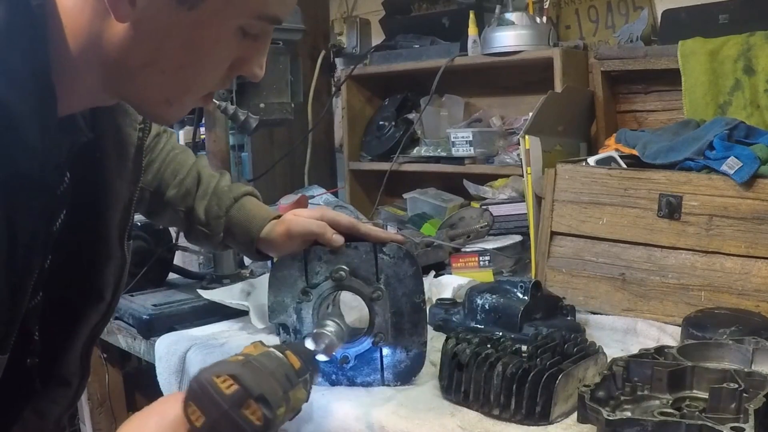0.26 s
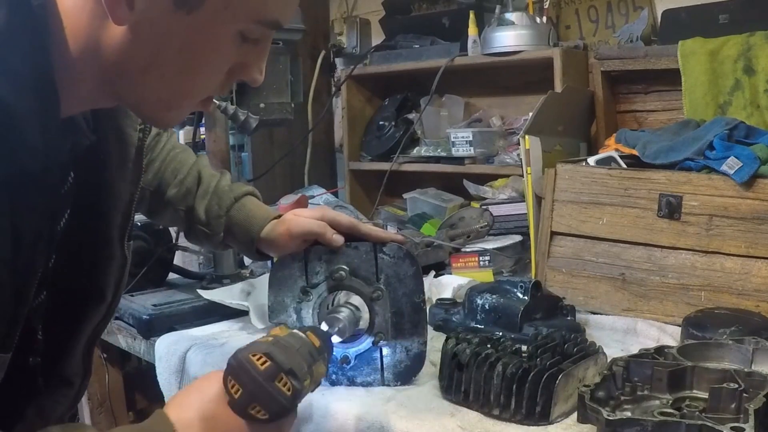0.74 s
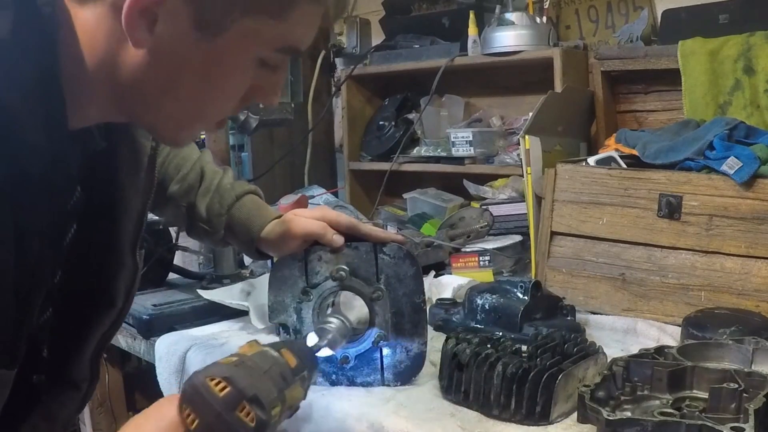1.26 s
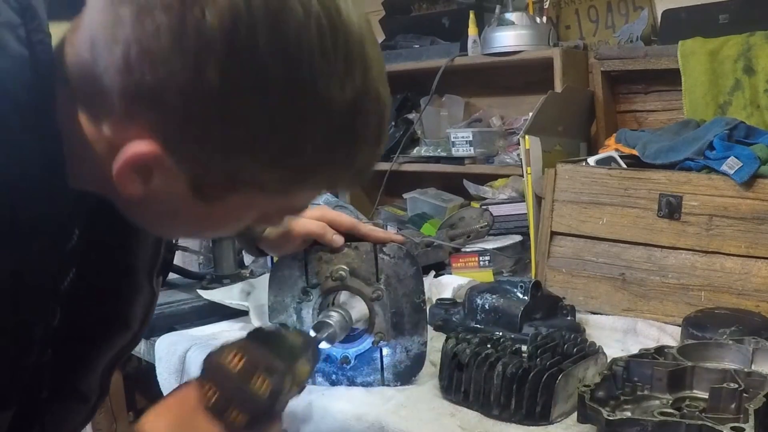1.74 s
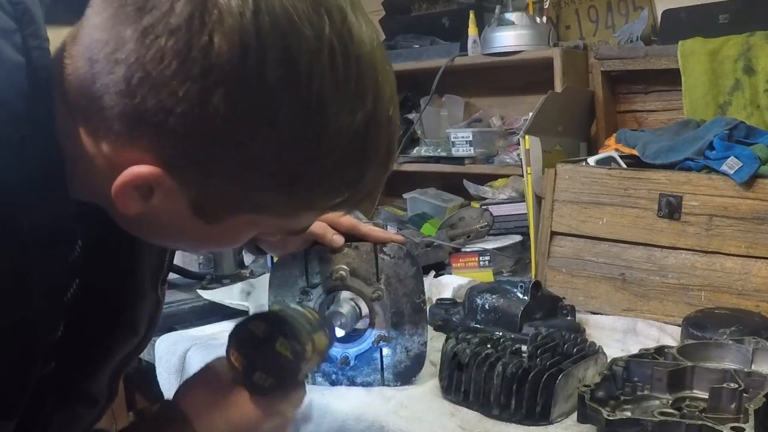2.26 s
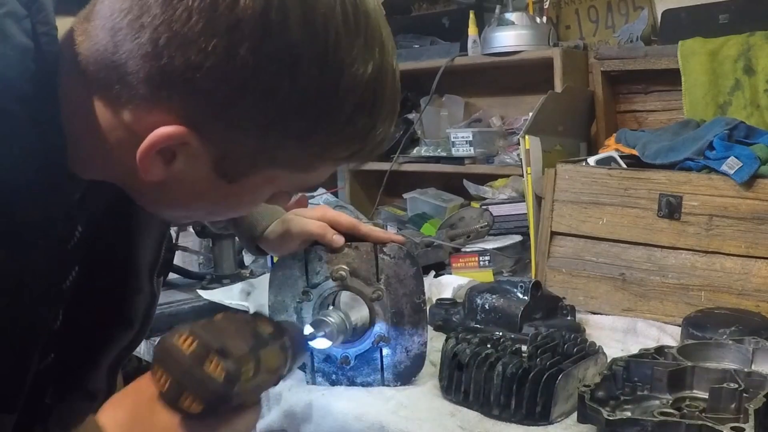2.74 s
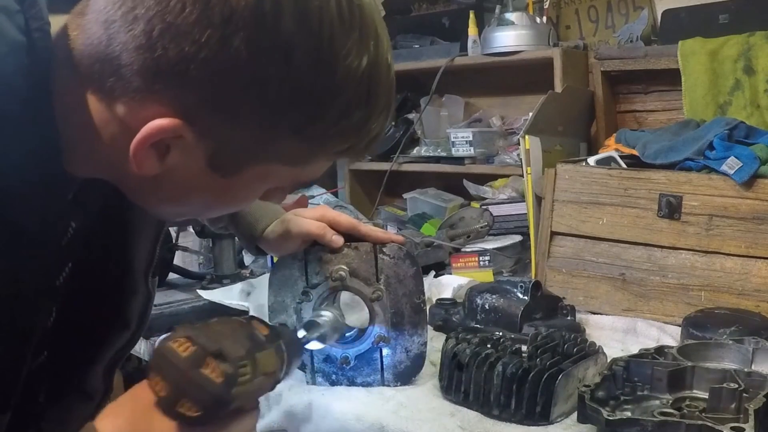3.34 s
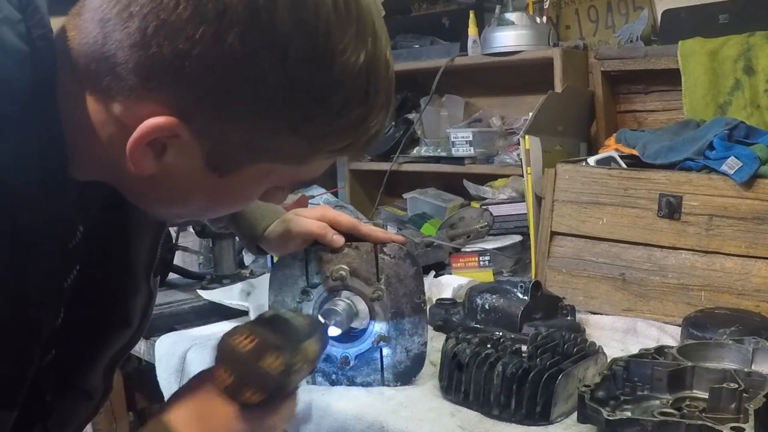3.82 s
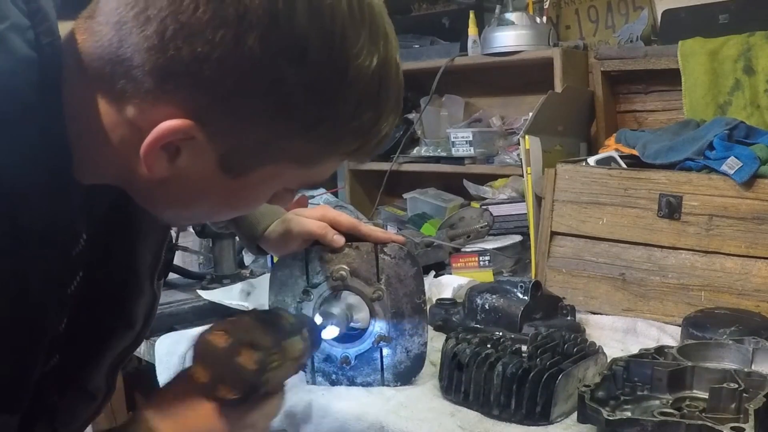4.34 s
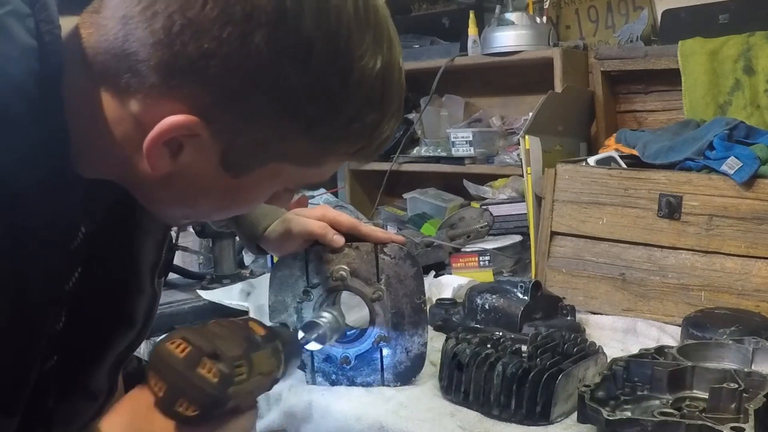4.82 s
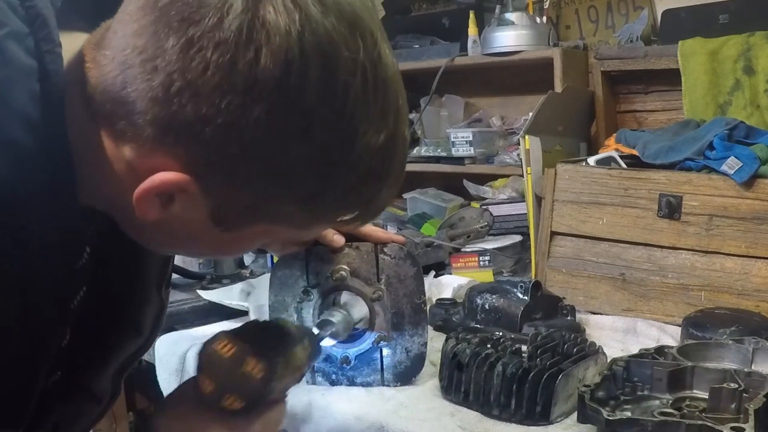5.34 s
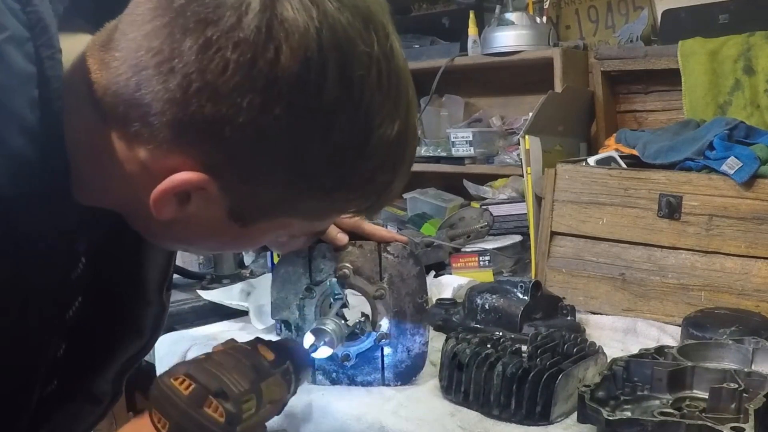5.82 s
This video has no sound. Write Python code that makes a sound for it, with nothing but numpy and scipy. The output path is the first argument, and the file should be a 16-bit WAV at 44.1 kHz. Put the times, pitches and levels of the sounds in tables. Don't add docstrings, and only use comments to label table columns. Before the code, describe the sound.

In a small, dry workshop, heard an arm's length away, a cordless drill is already running, honing a metal cylinder. Its gear whine near 2 kHz surges to almost 3 kHz around 0.3 s, then settles by 0.75 s, over a rough fan-and-brush roar and a thin steady 4 kHz whistle. Abrasive stones rasp and hiss brightly, throbbing with rotation. Stroke ends bring brief clattering bursts, bench shudder and sagging pitch: firm at 0.9, 1.6 and 2.4 s, light at 3.1, softer at 3.8, jolting at 4.5, heavy at 5.3. Pitch dips toward 2.7-3 s, jumps at 3.2, drops at 3.5, then climbs and holds fast from 3.8. Tiny spring pings appear occasionally. At 5.7 s the tool jumps the rim: hard knocks, a short casting ring, scraping falls away. The motor brakes and stops by 5.92 s, leaving faint ticks and low room noise.

```python
import sys
import numpy as np
from scipy import signal
from scipy.fft import rfft, irfft, next_fast_len
from scipy.io import wavfile
from scipy.ndimage import uniform_filter1d

SR = 44100
rng = np.random.default_rng(int(sys.argv[2]) if len(sys.argv) > 2 else 0)


def makeup_ratio(level_db):
    decades = np.asarray(level_db, float) / 20
    return 10 ** decades


def bounce(signal):
    frames = np.transpose(np.atleast_2d(signal))
    limited = np.clip(frames, -1, 1)
    pcm = np.round(limited * 32767).astype(np.int16)
    wavfile.write(sys.argv[1], SR, pcm)


N = 268156
T = np.arange(N) / SR
SLOW = T[::64]

CARRIER = 0.01115
FINGER_S = 0.05
RIM_S, STOP_S = 5.71, 5.915
BIND_LAG_S = 0.0395

# start_s, mesh_hz (teeth of the sun gear meeting per second, hone running free)
TRIGGER = [(0, 2234), (0.14, 2314), (0.24, 2877), (0.32, 2935), (0.41, 2854), (0.6, 2250), (0.74, 2041),
           (1.9, 2014), (2.02, 1884), (2.27, 1950), (2.63, 1831), (2.72, 1705), (3.0, 1675), (3.19, 2697),
           (3.3, 2477), (3.49, 1556), (3.6, 2052), (3.82, 2464), (5.05, 2506)]
# middle_s, half_length_s, bench_db, speed_sag_hz, grip (0 to 1)
STROKES = [
    (0.182, 0.065, -62, 0, 0.02),
    (0.888, 0.053, -33.5, 120, 0.75),
    (1.633, 0.051, -34.5, 160, 0.49),
    (2.382, 0.085, -34, 230, 0.97),
    (3.117, 0.031, -47, 9.5, 0.18),
    (3.766, 0.068, -50, 20, 0.5),
    (4.54, .045, -27.5, 91.5, 0.87),
    (5.277, 0.075, -30.5, 219.5, 0.87),
    (5.706, 0.038, -29.5, 8.5, 0),
]


def unit(x):
    return x / np.sqrt(np.mean(x ** 2))


def curves(*tables):
    s, *columns = np.transpose(np.vstack(tables))
    return [np.interp(T, s, column) for column in columns]


def bumps(at, half, size, rise=1, fall=1):
    total = np.zeros(len(SLOW))
    for s, width, height in zip(at, half, size):
        width = width * np.where(SLOW < s, rise, fall)
        total += height * np.exp(-0.5 * ((SLOW - s) / width) ** 2)
    return np.interp(T, SLOW, total)


def soft_step(at, fall):
    return 0.5 + 0.5 * np.tanh((SLOW - at) / fall)


def walk(rate):
    k = int(SR / rate)
    held = np.repeat(rng.standard_normal(N // k + 1), k)
    held = uniform_filter1d(uniform_filter1d(held, k), k)[:N]
    return unit(held - uniform_filter1d(held, 5 * k))


def tint(x, points=((1, 0), (2, 0)), peaks=(), lo_hz=0, hi_hz=1e6):
    size = next_fast_len(len(x))
    hz = np.arange(size // 2 + 1) * SR / size + 1
    point_hz, point_db = np.transpose(np.array(points))
    gain = makeup_ratio(np.interp(np.log(hz), np.log(point_hz), point_db))
    for centre, width, db in peaks:
        gain = gain * makeup_ratio(db / (1 + (2 * (hz - centre) / width) ** 2))
    gain = gain / np.sqrt((1 + (lo_hz / hz) ** 12) * (1 + (hz / hi_hz) ** 12))
    return irfft(rfft(x, size) * gain, size)[:len(x)]


def ring(x, hz, t60):
    r = np.exp(-np.log(1000) / (t60 * SR))
    w = 2 * np.pi * hz / SR
    return signal.lfilter([np.sin(w)], [1, -2 * r * np.cos(w), r * r], x)


def grit(rate, spread_db, tail_s):
    hit = rng.random(N) < rate / SR
    size = np.minimum(rng.exponential(size=N), 3)
    slips = signal.lfilter([1], [1, -np.exp(-1 / (tail_s * SR))], hit * makeup_ratio(spread_db * size))
    return unit(rng.standard_normal(N) * (1 + 0.27 * slips))


def tone(cycles, db, wobble_db):
    return np.sqrt(2) * makeup_ratio(db + wobble_db * walk(24.97)) * np.sin(2 * np.pi * cycles)


def speed():
    # start_s, mesh_hz
    run_down = [
        (5.6, 2292),
        (5.72, 2033),
        (5.8, 1902),
        (5.87, 1680),
        (5.92, 1390),
    ]
    at, half, _, sag, _ = np.transpose(STROKES)
    free, = curves(TRIGGER, run_down)
    return uniform_filter1d(free, int(FINGER_S * SR)) - bumps(at + BIND_LAG_S, half, sag)


def faster():
    return (curves(TRIGGER)[0] - 2250) / 1000


def effort(db, swing_db, loudest, bound_db, off_db, coast_db, brake_db=0, off_s=RIM_S):
    # start_s, level_db
    noise_level = [(0, 1), (0.3, 0), (0.62, -0.3), (0.85, 0), (1.3, 0.5), (1.5, 0.5), (1.95, -0.4), (2.2, 1.4),
                   (2.7, 0), (3.1, 1), (3.4, -0.5), (3.62, 1.7), (3.95, 0), (4.35, 1), (4.68, -1.5), (5.1, 1),
                   (5.42, 0), (5.9, 0)]
    stroke_s, duck_db, recover_s = 0.32, -2, 0.31
    at, half, _, _, grip = np.transpose(STROKES)
    ends = np.r_[at[0] - stroke_s, at[:-1], at[-2] + stroke_s]
    stroke = np.interp(SLOW, ends, np.arange(len(ends)))
    duck = np.zeros(len(SLOW))
    for s, width, strength in zip(at + half, half, grip):
        duck += strength * soft_step(s, width / 2) * np.exp(-np.maximum(SLOW - s, 0) / recover_s)
    db = db + swing_db * np.cos(2 * np.pi * (stroke - loudest))
    db = db + duck_db * duck + off_db * soft_step(off_s, 0.019)
    db = np.interp(T, SLOW, db) + curves(noise_level)[0]
    db += bound_db * bumps(at + BIND_LAG_S, half, grip)
    db += bumps([5.865], [0.036], [brake_db])
    stopped = np.interp(T, SLOW, soft_step(STOP_S, 0.018))
    return (1 - stopped) * db + stopped * coast_db


def gear_whine(hz, turns, carrier):
    # start_s, sun_gear_db, ring_gear_db; then the same while running down
    teeth = [(0.1, -37, -34), (0.2, -33, -32), (0.3, -34, -29.5), (0.42, -31, -33), (0.5, -31, -41),
             (0.78, -31, -39), (1.1, -34, -36.5), (1.36, -29, -36), (1.62, -35.5, -39.5), (1.9, -30, -35),
             (2.25, -36, -40), (2.5, -35, -40.5), (2.63, -29.5, -41), (2.72, -35, -38), (3.0, -42, -40),
             (3.06, -35, -36), (3.2, -39, -37), (3.4, -33, -35), (3.5, -33, -35), (3.62, -35, -35.5),
             (3.76, -52, -39), (4.1, -32.5, -46), (4.55, -55, -46), (4.76, -35.5, -39), (5.02, -31.5, -36),
             (5.3, -64, -39)]
    teeth_down = [(5.7, -42, -40), (5.74, -33, -48), (5.86, -32, -37), (5.92, -34, -50)]
    # multiple, level_db
    mesh_orders = [(1, 0), (2, -9)]
    ring_orders = [(2, -4), (4, -5)]
    # centre_hz, width_hz, level_db
    nose = [(2700, 300, 4), (3180, 400, -12)]
    gearcase = [(850, 52, 8), (1022, 14, -16)]
    # middle_s, half_length_s, gain_db
    third_sings = [(0.3, .05, 2), (2.0, .1, 3), (2.85, .12, 9), (3.1, .05, 9), (3.3, 0.069, 5.5),
                   (3.55, 0.048, 11), (3.68, .05, 8.9)]
    ring_share, planet_share = 0.512, 0.26

    mesh_db, ring_db = curves(teeth, teeth_down)
    slowing = np.clip(-np.gradient(curves(TRIGGER)[0]) * SR / 1000, 0, None)
    mesh_db = mesh_db - 2.6 * uniform_filter1d(slowing, int(FINGER_S * SR))
    planet_db = -49 + 1.15 * (hz - 2000) / 100 + 3.1 * walk(6)

    fast = np.clip((hz - 2100) / 400, 0, 1)
    chatter = 0.006 + 0.009 * fast + 0.008 * (T > RIM_S)
    sun = turns + np.cumsum(chatter * hz * walk(220)) / SR
    ring_chatter = (0.0042 + 0.01 * fast) * ring_share
    ring_gear = ring_share * turns + np.cumsum(ring_chatter * hz * walk(40)) / SR

    beat = np.cos(2 * np.pi * carrier)
    light, heavy = unit(makeup_ratio(-3.5 * beat)), unit(makeup_ratio(7 * beat))
    whine = light * sum(tone(k * sun, mesh_db + db + 2, 2.2) for k, db in mesh_orders)
    flat_out = np.clip((hz - 2600) / 200, 0, 1)
    whine += light * fast * (1 - flat_out) * tone((1 + 8 * CARRIER) * sun, mesh_db + 1, 2)
    whine += light * flat_out * tone((1 - 6 * CARRIER) * sun, mesh_db + 1, 2)
    whine = tint(whine, peaks=nose)

    whine += tint(heavy * tone(ring_gear, ring_db + 1.5 - 3 * fast, 1.4), peaks=gearcase)
    sings_db = ring_db + bumps(*np.transpose(third_sings))
    whine += heavy * tone(3 * ring_gear, sings_db - 6, 2.5)
    for k, db in ring_orders:
        whine += heavy * makeup_ratio(sings_db + db) * np.sin(2 * np.pi * k * ring_gear)
    return whine + tone(planet_share * sun, planet_db - 0.3, 1.5)


def speed_control(hz, motor):
    # start_s, level_db
    switch_level = [(0.0, -45), (0.64, -33.5), (0.78, -32), (0.94, -35.5), (2.24, -34), (2.32, -37),
                    (2.52, -41), (2.73, -31.5), (2.97, -47), (3.1, -33), (3.94, -37), (4.14, -26),
                    (4.29, -37.5), (5.7, -35.5), (5.9, -44), (5.95, -56)]
    # middle_s, half_length_s, gain_db
    first_sings = [(0.716, 0.047, 12), (1.178, 0.053, 14.5), (1.332, 0.066, 13), (1.999, 0.045, 12),
                   (2.63, .05, 6), (3.465, 0.071, 8), (4.45, 0.063, 10)]
    second_sings = [(0.93, .06, 6), (1.93, 0.081, 13), (2.15, 0.096, 16), (2.66, 0.052, 22),
                    (2.82, 0.049, 19), (5.8, .05, 10.1)]
    whistle_db, = curves(switch_level)
    switch = 4051.5 * T
    whistle = tone(switch, whistle_db, 1.2) + tone(2 * switch, whistle_db - 8, 2.5)
    first_db = -45 + 0.58 * (hz - 2000) / 100 + 1.3 * walk(6)
    second_db = -50 - 0.5 * (hz - 2000) / 100 + 2.1 * walk(6)
    sides = tone(switch + 2 * motor, first_db + bumps(*np.transpose(first_sings)), 1.3)
    sides += tone(switch + 4 * motor, second_db + bumps(*np.transpose(second_sings)), 1.2)
    return whistle + sides


def drill():
    hz = speed()
    turns = np.cumsum(hz) / SR
    motor = turns / 9
    carrier = CARRIER * (turns - turns[int(2.848 * SR)])
    tones = gear_whine(hz, turns, carrier) + speed_control(hz, motor)
    return tones * np.clip((STOP_S - T) / 0.0095, 0, 1), carrier


def band(source, lo_hz, hi_hz, db):
    # pitch_hz, level_db (per Hz)
    colour = [(150, 3), (250, -12.5), (476, -15.5), (860, -1), (955, -3.5), (1400, -3.5), (1950, -3.5),
              (3710, -5), (4190, -4), (6360, -4), (8260, 4), (10400, -14), (12500, -10.5), (15100, -13.5),
              (15400, -25), (15680, -11), (16000, -30)]
    # centre_hz, width_hz, level_db
    housing = [(581, 104, 9.5), (687, 25, 5), (854, 42, 7), (1054, 70, 6.5), (2620, 180, 2.5),
               (2790, 19, 3.5), (3580, 530, -1), (4180, 150, 2.5), (4220, 640, 1), (8100, 1200, -5.5),
               (11240, 3800, 8), (12000, 630, 3)]
    return makeup_ratio(db) * unit(tint(source, colour, housing, lo_hz, hi_hz))


def hone(chuck):
    # start_s, level_db
    scrape_level = [(0, -2.5), (0.3, -1.5), (0.6, 1.5), (1.25, -2), (1.45, 1.5), (1.85, -2), (2.03, -3.5),
                    (2.18, 2), (2.45, -0.5), (2.77, -2.5), (2.95, 2.5), (3.2, 0.5), (3.45, -2), (4.1, 0),
                    (4.4, 1), (5.0, 2), (5.2, 0.5), (5.45, 2)]
    rasp_db = effort(-27, swing_db=0.3, loudest=1.5, bound_db=-3, off_db=-10.5, coast_db=-55, off_s=5.71)
    scuff_db = effort(-33, swing_db=2, loudest=1.13, bound_db=-1.5, off_db=-11, coast_db=-63, off_s=5.3)
    hiss_db = effort(-26, swing_db=1, loudest=1.35, bound_db=-2.5, off_db=-10, coast_db=-55, off_s=5.71)
    sizzle_db = effort(-28.5, swing_db=-0.5, loudest=2, bound_db=-3.5, off_db=-13, coast_db=-57, off_s=5.66)
    stones = 3
    press_db = 0.5 * np.cos(2 * np.pi * stones * chuck) + 0.5 * np.cos(2 * np.pi * chuck) + 0.4 * walk(14)
    seat_db, = curves(scrape_level)
    rasp_db = rasp_db + 2.5 * faster()
    scuff_db = scuff_db + seat_db
    hiss_db = hiss_db + 0.41 * seat_db
    slips = grit(230, 3.2, 0.00089)
    rasp = band(slips, 2980, 4830, rasp_db + 0.65 * walk(30.9))
    scuff = band(slips, 5150, 6900, scuff_db + 1.3 * walk(25))
    hiss = band(slips, 7300, 9120, hiss_db + 1.2 * walk(35) + 0.9 * walk(16))
    sizzle = band(grit(230, 3, 0.001), 11000, 14000, sizzle_db + 0.9 * walk(30) + 0.9 * walk(12))
    return makeup_ratio(press_db) * (rasp + scuff + hiss + sizzle)


def whir(chuck):
    # centre_hz, width_hz, level_db
    bench_modes = [(98, 32, -11), (145.3, 11, -4.5), (182, 32, -4.5), (213, 72, -2.5)]
    roar_db = effort(-28, swing_db=1, loudest=1.35, bound_db=-2.5, off_db=-4.5, coast_db=-44.5, brake_db=6)
    rattle_db = effort(-25, swing_db=1, loudest=1.3, bound_db=-3.5, off_db=-2.5, coast_db=-48.5, brake_db=4)
    uneven_db = 0.6 * np.cos(2 * np.pi * chuck) + 0.5 * walk(14)
    roar_db = roar_db + 1 * faster() - 0.7 + uneven_db
    rattle_db = rattle_db + 0.5 * faster() - 0.6 + uneven_db
    roar = band(grit(300, 3.0, 0.003), 250, 1400, roar_db + 0.8 * walk(20))
    rattle = band(grit(250, 3.0, 0.0024), 1475, 3330, rattle_db + 0.51 * walk(25.26))

    at, half, jolt_db, _, _ = np.transpose(STROKES)
    rumble = makeup_ratio(-50.5) + bumps(at, half, makeup_ratio(jolt_db), rise=0.66, fall=0.8)
    shake = grit(60, 4.7, 0.0053)
    bench = sum(makeup_ratio(db) * unit(ring(shake, hz, 4.3 / width)) for hz, width, db in bench_modes)
    bench = tint(bench, lo_hz=68.6)
    return roar + rattle + makeup_ratio(1.2) * rumble * unit(bench)


def clatter():
    # start_s, peak_db, ring_hz,
    # body_db, skid_t60_s
    stroke_catches = [(0.1236, -18, 8380, -14, .03), (0.8126, -4.5, 8200, -20, .05), (0.834, -6, 7990, -14, .06),
                      (0.8729, -9, 7940, -2, .03), (0.8913, -1, 4400, -11, 0.048), (0.9015, -1, 6500, -21, .035),
                      (1.578, -4, 8600, -16, .02), (1.6015, -6, 8200, -7, 0.049), (1.609, -7, 7900, -12, .025),
                      (1.6258, -7, 6050, -6, 0.052), (1.6445, -0.5, 6900, -11, .035), (1.6635, -5.5, 7400, -9, .05),
                      (1.708, -6.5, 6800, -14, .03), (1.7389, -13, 4470, -13, .03),
                      (2.3121, -2.5, 4105, -8.5, 0.039), (2.321, -5, 5210, -12, 0.055),
                      (2.3376, -0.5, 7900, -11, .05), (2.344, -8, 5900, -12, 0.056), (2.365, -9, 4200, -18, .06),
                      (2.374, -3.5, 5200, -18, 0.05), (2.397, -13, 8100, -13, .04), (2.405, -6, 6840, -10, .07),
                      (2.414, -14, 8300, -14, 0.046), (2.437, -4, 8190, -21, .02),
                      (3.6379, -5, 6790, -16, .03), (3.7237, -5, 4580, -16.5, 0.041), (3.749, -3, 4060, -16, 0.046),
             (3.7715, -7, 7340, -17.5, 0.039), (3.8587, -8, 6040, -18, .03), (4.47, 0, 7800, -15, .05),
             (4.4798, -3, 4200, -12, 0.046), (4.51, -2, 7500, -10, 0.042), (4.527, -6, 5970, -7, 0.045),
             (4.561, -4, 8500, -15, .05), (4.572, -7, 8000, -11, .05), (4.59, -5, 8160, -10, 0.072),
             (5.092, -6, 4330, -17, .03), (5.1774, -2, 8250, -21, 0.022), (5.205, -15, 8300, -14, 0.029),
             (5.2155, -3, 4070, -8, 0.029), (5.219, -4, 8100, -14, .04), (5.236, -7.5, 5760, -2, .05),
             (5.2632, -4, 8160, -16, .035), (5.281, -3.5, 8050, -9, 0.05), (5.305, -6, 5640, -9, .03),
             (5.309, -4.5, 5650, -12, 0.056), (5.346, -6, 7700, -17, 0.036)]
    at_rim = [(5.6651, -14, 3660, 8, .035), (5.672, -8, 7600, -13, 0.058), (5.677, -9, 6500, -20, .05),
              (5.684, -10, 7400, -18, .05), (5.693, -8.5, 5900, -3, 0.062), (5.708, -14, 7300, -8, 0.036),
              (5.925, -28, 3800, 3, .09), (5.935, -30, 7300, -6, .06), (5.9773, -24.5, 3100, -11, 0.043),
              (5.99, -26, 7300, -12, 0.13), (6.005, -32, 5200, -7, .1), (6.036, -32, 7000, -12, .04),
              (6.0714, -40, 7600, -6, 0.032)]
    catches = stroke_catches + at_rim
    length = 4096
    out, t = np.zeros(N + length), np.arange(length) / SR
    bright_filter = signal.butter(4, (4000, 9100), "band", fs=SR, output="sos")
    body_filter = signal.butter(2, (800, 3000), "band", fs=SR, output="sos")
    for s, db, hz, low_db, t60 in catches:
        noise = rng.standard_normal(length)
        click = 4 * (t == t[9])
        skid = (noise * (1 - np.exp(-t / 0.0004)) + click) * np.exp(-np.log(1000) * t / t60)
        bright = signal.sosfilt(bright_filter, skid)
        stone = ring(skid, hz, 0.005)
        body = signal.sosfilt(body_filter, skid)
        burst = 0.7 * bright / abs(bright).max() + 0.4 * stone / abs(stone).max()
        out[int(s * SR):][:length] += makeup_ratio(db) * (burst + makeup_ratio(low_db) * body / abs(body).max())
    return out[:N]


def knocks():
    # start_s, body_db, rim_ring_db
    blows_table = [(4.528, -16, -22), (5.238, -18, -30), (5.28, -29, -25), (5.6653, -11, -29.5),
                   (5.691, -20.5, -19), (5.6945, -20, -8.5), (5.73, -36, -26), (5.771, -34, -20),
                   (5.818, -36, -21), (5.85, -30, -26), (5.884, -28, -25), (5.978, -42, -37),
                   (6.003, -52, -47)]
    # pitch_hz, level_db, t60_s
    casting = [(1090, -20, 0.057), (1586, 2, 0.036), (1680, 7, 0.028), (2360, -8, .05), (2776, 1, 0.12),
               (2830, 1, 0.18), (3080, -9, .15)]
    # start_s, peak_db, pitch_hz
    pings = [(0.5327, -14.5, 4374), (0.8918, -17, 4350), (2.3123, -17, 4130), (2.5585, -21.5, 4600),
             (3.24, -19, 4690), (3.73, -21, 4595), (3.5973, -19, 4330), (6.0372, -44, 4203)]
    out = np.zeros(N)
    at, body_db, rim_db = np.transpose(blows_table)
    for hz, mode_db, t60 in casting:
        chance_db = 1.3 * rng.standard_normal(len(at))
        blow_db = rim_db if hz > 2600 else body_db
        blows = np.zeros(N)
        blows[(at * SR).astype(int)] = makeup_ratio(blow_db + mode_db - 6.5 + chance_db)
        out += ring(blows, hz, t60)
    for s, db, hz in pings:
        start = int(s * SR)
        flick = np.arange(N - start) == 0
        out[start:] += makeup_ratio(db) * ring(ring(flick, hz, 0.05), hz, 0.0053) / 8
    return out


def swelling_tones(chuck):
    # middle_s, half_length_s, level_db, pitch_hz, waver_hz
    throbbing_tones = [(0.22, 0.035, -30, 1050, 20), (0.3, .07, -33, 730, 22), (0.45, 0.033, -34, 1050, 20),
                       (0.7, .13, -34.5, 1050, 15), (0.72, .15, -34.5, 850, 25), (1.2, .3, -36, 850, 18.7),
                       (1.85, .2, -36.5, 910, 25), (1.15, .14, -32, 1090, 11), (1.45, .17, -33, 1040, 12),
                       (0.32, .11, -31.5, 1510, 28), (0.05, .06, -34, 1150, 30), (1.85, .11, -34, 1045, 12),
                       (1.67, .06, -34, 850, 37), (2.1, 0.046, -32.5, 830, 40),
                       (2.5, .12, -30.5, 880, 15.4), (2.85, .21, -27.5, 858, 10), (3.1, .05, -30, 875, 15),
                       (3.47, .11, -31, 860, 23), (3.62, 0.083, -35, 1040, 30), (5.54, 0.051, -29, 870, 20),
                       (2.85, .15, -36, 3400, 116), (2.63, .05, -36, 2760, 50), (5.86, 0.028, -34, 870, 18),
                       (3.85, .12, -35, 1190, 30), (4.35, .2, -34.5, 1180, 35.4),
                       (5.55, .13, -36, 1160, 40), (3.7, .08, -35.5, 600, 14), (4.2, .25, -38.5, 620, 26.3),
                       (3.25, 0.049, -38, 690, 15), (2.85, .15, -37, 2560, 40.1), (2.0, .15, -38, 700, 37)]
    unthrobbing_tones = [(0.08, 0.063, -33, 3420, 100), (2.08, .2, -31.5, 2740, 150), (3.22, 0.11, -35, 2620, 170),
                         (3.5, .02, -29, 3110, 30), (3.5, .05, -30, 1650, 60), (4.88, .18, -34, 3400, 150),
                         (3.9, .06, -33, 2900, 59), (4.15, 0.17, -30.5, 4220, 120), (4.3, 0.099, -30, 3400, 80),
                         (4.5, .12, -36, 2807, 9), (5.08, .05, -33, 4200, 122), (5.31, 0.045, -33, 2812, 10),
                         (5.551, .1, -27.5, 3300, 235), (5.81, .06, -41, 4890, 17), (5.8, .08, -47, 8103, 4),
                         (6.02, .09, -52, 2920, 10), (5.8, 0.082, -36, 2760, 20), (4.1, .14, -36, 2490, 14),
                         (4.9, .17, -34, 2520, 15), (0.22, .05, -33, 2740, 30), (0.43, .05, -35, 2720, 40)]
    out = np.zeros(N)
    throb = unit(makeup_ratio(6.3 * np.cos(2 * np.pi * chuck)))
    for k, (s, half, db, hz, waver_hz) in enumerate(throbbing_tones + unthrobbing_tones):
        start = max(int((s - 1.5 * half) * SR), 0)
        span = slice(start, min(int((s + 1.5 * half) * SR), N))
        t = T[span]
        drift = unit(uniform_filter1d(rng.standard_normal(SR), 150))[:len(t)]
        swell = np.sqrt(2) * makeup_ratio(db) * np.exp(-((t - s) / half) ** 4)
        wave = swell * np.sin(2 * np.pi * np.cumsum(hz + waver_hz * drift) / SR)
        out[span] += wave * (throb[span] if k < len(throbbing_tones) else 1)
    return out


def background_noise():
    # pitch_hz, level_db (per Hz)
    background_colour = [(12, -35), (20, 1.5), (141, -7.5), (182, -21), (241, -6.5), (426, 0.5), (600, -2.5),
                         (780, -49), (11000, -55), (13500, -28)]
    return makeup_ratio(-45.5) * unit(tint(rng.standard_normal(N), background_colour))


def scene():
    # pitch_hz, side_minus_mid_db
    side_walls = [(60, -22), (110, -18), (200, -16), (380, -14), (700, -22.5), (1290, -22.5), (2380, -21.5),
                  (4400, -20.5), (8120, -22), (15000, -11)]
    room_t60_s, room_db, left_db = 0.087, -15, -0.64
    tones, chuck = drill()
    near = tones + hone(chuck) + whir(chuck) + clatter() + knocks() + swelling_tones(chuck)
    t = T[:SR // 2]
    tails = rng.standard_normal((2, len(t))) * np.exp(-np.log(1000) * t / room_t60_s) * (t > 0.003)
    back, wall = (signal.fftconvolve(near, tail / np.linalg.norm(tail))[:N] for tail in tails)
    mid = near + makeup_ratio(room_db) * back + background_noise()
    side = tint(makeup_ratio(1.0) * wall + background_noise(), side_walls, lo_hz=58)
    return np.array([makeup_ratio(left_db / 2) * (mid + side), makeup_ratio(-left_db / 2) * (mid - side)])


def roll_off(x):
    return signal.sosfilt(signal.butter(12, 15950, fs=SR, output="sos"), x)


def record(dry):
    rounded = np.tanh(0.66 * dry) / 0.74
    top_cut = signal.ellip(8, 0.3, 60, 15780, fs=SR, output="sos")
    return roll_off(signal.sosfilt(top_cut, rounded))


dry = scene()
out = record(dry)
bounce(out)
```